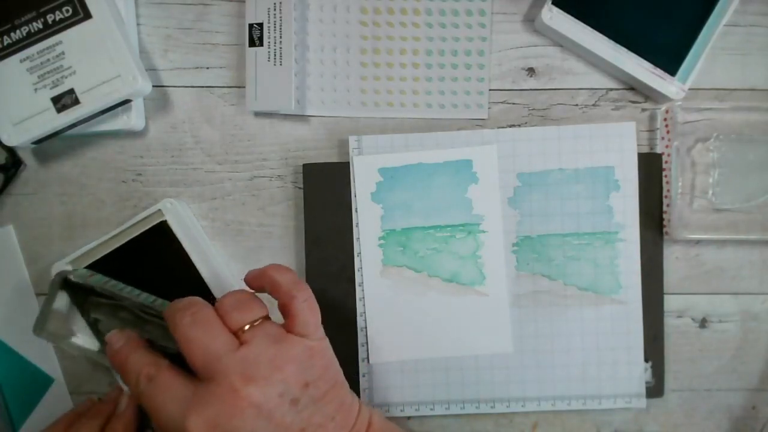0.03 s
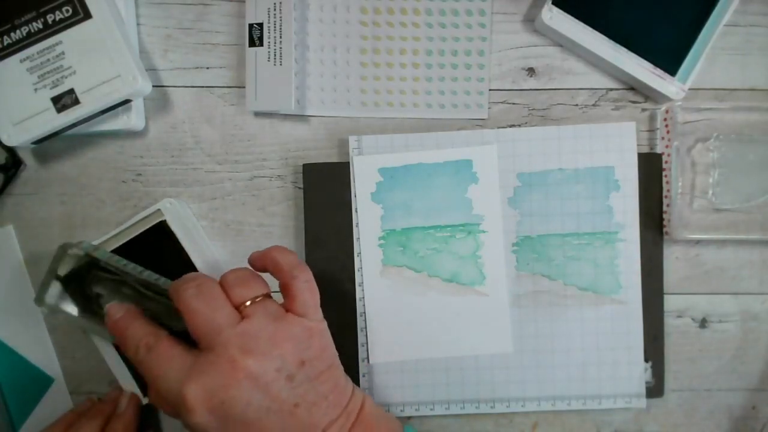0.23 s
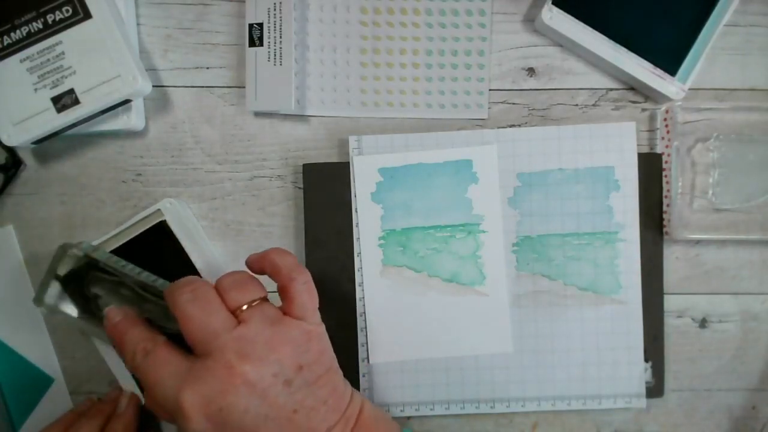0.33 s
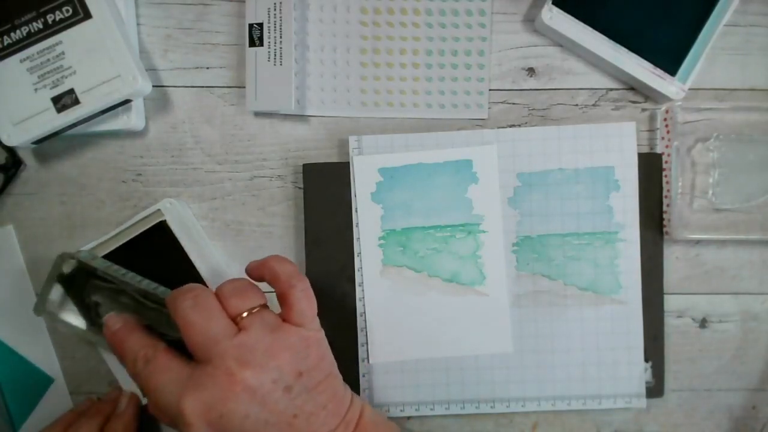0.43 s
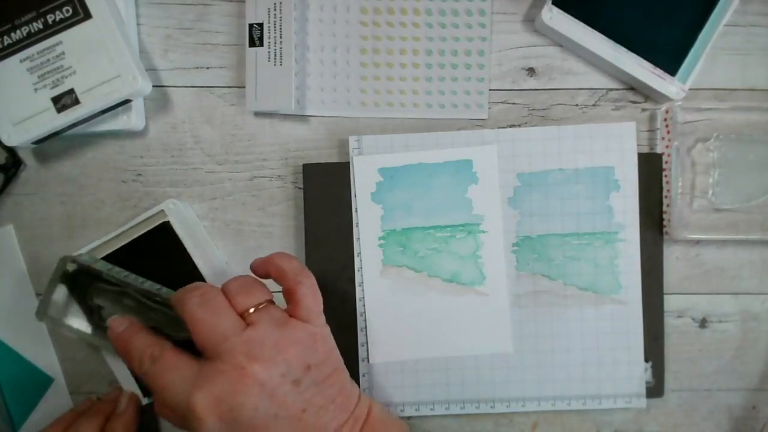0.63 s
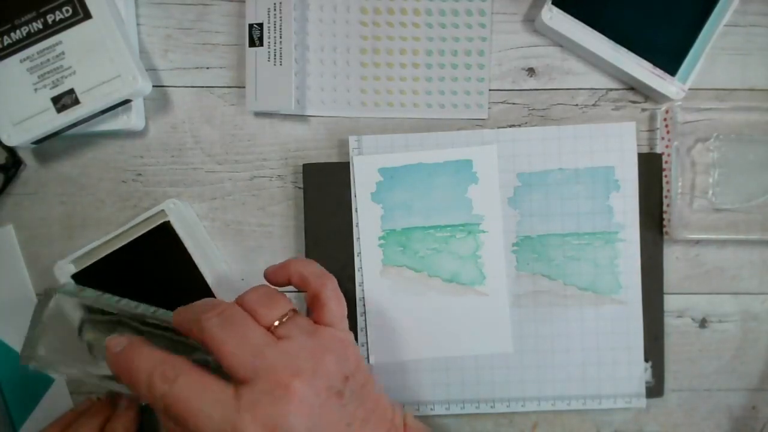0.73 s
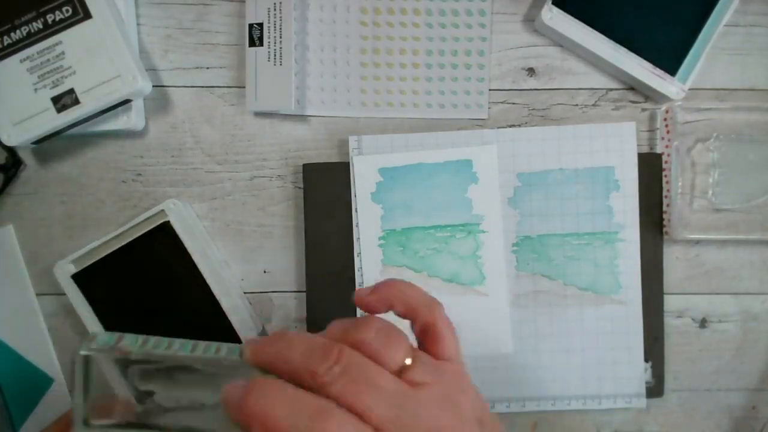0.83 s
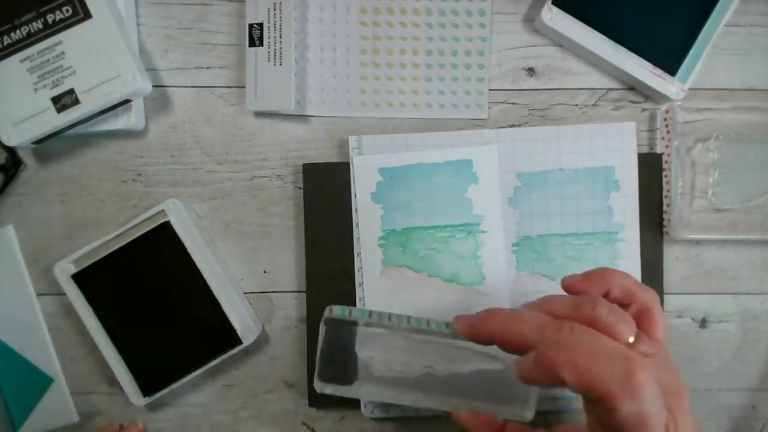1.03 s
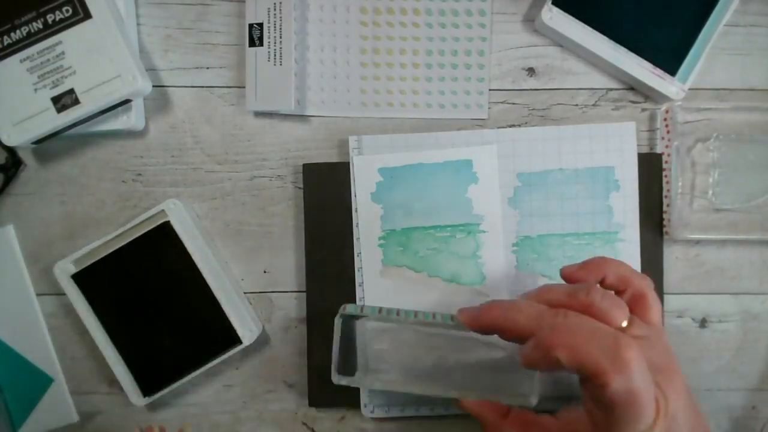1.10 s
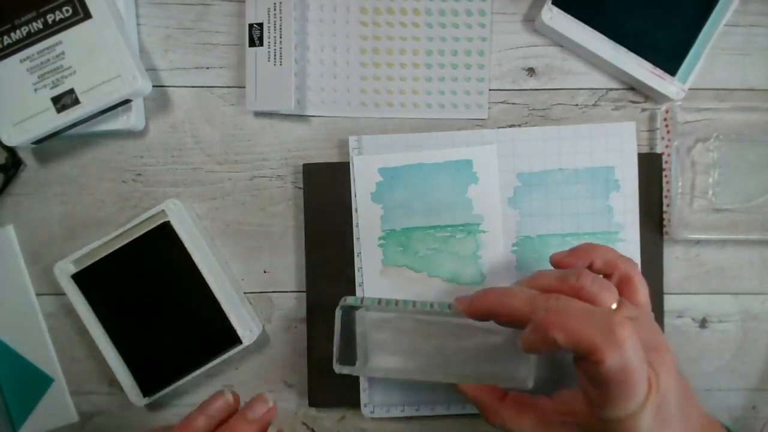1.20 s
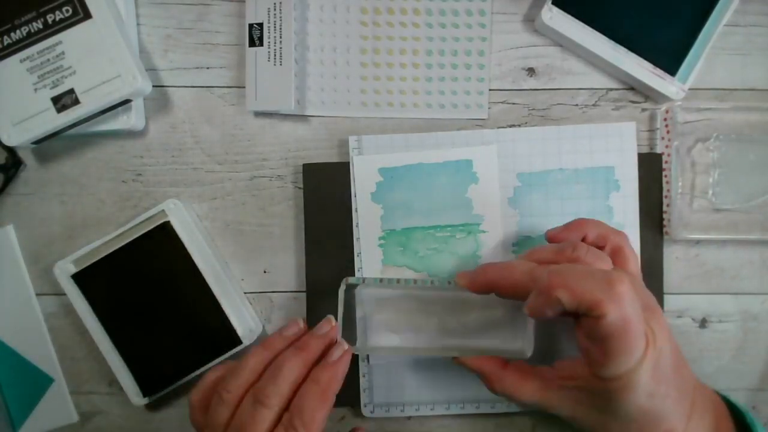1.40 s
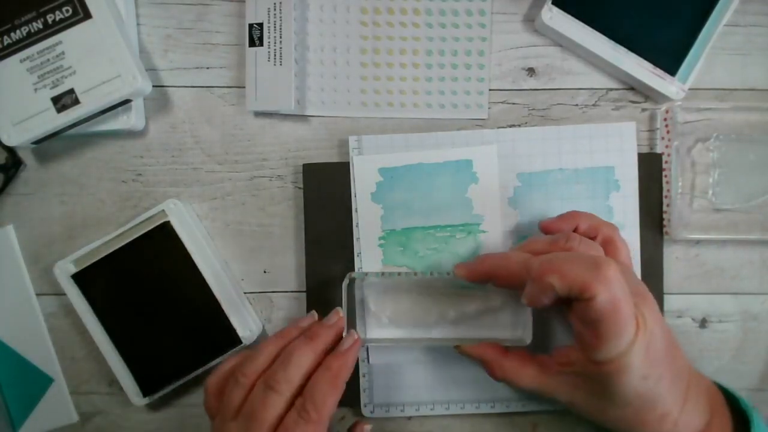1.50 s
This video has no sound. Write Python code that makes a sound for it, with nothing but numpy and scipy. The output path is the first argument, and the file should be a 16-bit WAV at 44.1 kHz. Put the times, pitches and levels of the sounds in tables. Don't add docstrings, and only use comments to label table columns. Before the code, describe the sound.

A block taps an ink pad in a plastic case at about 0.2, 0.4 and 0.6 seconds, growing from a dull gentle thud to a hard, rattling clack. Deep desk thumps boom through the microphone stand; tiny clicks and faint sticky crackles surround the taps. From 0.75 to 1.45 a sleeve rubs softly across the desk, strongest near 1.0, over quiet hum, fan and hiss in a small dry room.

```python
import sys
import numpy as np
from scipy import signal
from scipy.io import wavfile
from scipy.ndimage import uniform_filter1d

SR = 44100
rng = np.random.default_rng(int(sys.argv[2]) if len(sys.argv) > 2 else 0)


def persist_wave(psi):
    counts = np.round(np.clip(psi, -1, 1) * 32767).astype(np.int16)
    wavfile.write(sys.argv[1], SR, np.atleast_2d(counts).T)


def nominal_scale(level):
    x = np.asarray(level, float) / 20
    return 10 ** x


N = 68355

# start_s, desk_thump_db, desk_knock_db, case_knock_db, edge_crack_db
TAPS = [
    (0.219, -5, -7.5, -22.5, -68),
    (.429, -1, -6, -18.5, -64),
    (.594, 2.5, 2.5, -4, -55.5),
]
# start_s, length_s, crackle_db, desk_push_db
PEELS = [
    (0.011, 0.031, -65.5, -32),
    (0.319, 0.033, -63, -22),
    (0.507, .02, -62.5, -24.5),
    (0.667, 0.0078, -56, -26.5),
]


def at_hz(points, hz):
    point_hz, point_db = np.array(points).T
    return np.interp(np.log(hz), np.log(point_hz), point_db, left=-60, right=-60)


def rms_one(x):
    return x / np.sqrt(np.mean(x ** 2) + 1e-20)


def drift(rate_hz):
    r = np.exp(-80 * np.pi * rate_hz / SR)
    slow = signal.lfilter([1], [1, -2 * r, r * r], rng.standard_normal(N // 40 + 2002))
    slow = rms_one(slow[2000:])
    return np.interp(np.arange(N) / 40, np.arange(len(slow)), slow)


def decay_per_sample(t60_s):
    return np.exp(-np.log(1000) / (t60_s * SR))


def ring(clicks, hz, t60_s):
    r = decay_per_sample(t60_s)
    w = 2 * np.pi * hz / SR
    return signal.lfilter([0, np.sin(w)], [1, -2 * r * np.cos(w), r * r], clicks + 1e-18)


def die_away(clicks, t60_s):
    return signal.lfilter([1], [1, -decay_per_sample(t60_s)], clicks)


def clicks_at(start_s, gains):
    out = np.zeros(N)
    places = np.clip((np.asarray(start_s) * SR).astype(int), 0, N - 1)
    np.add.at(out, places, gains)
    return out


def soften(x, hz):
    r = np.exp(-2 * np.pi * hz / SR)
    return signal.lfilter([(1 - r) ** 2], [1, -2 * r, r * r], x + 1e-18)


def banded_noise(spectrum, patchy_db):
    together = drift(6.0)
    edges = 19 * 2 ** np.arange(0, 9.9, 1 / 3)
    white = rng.standard_normal((2, N + 8000))
    out = 0
    for k, (low, high) in enumerate(zip(edges, edges[1:])):
        band_pass = signal.butter(2, [low, high], "band", fs=SR, output="sos")
        band = signal.sosfilt(band_pass, white[k % 2])[-N:]
        flicker_db = patchy_db * (0.23 * together + drift(8))
        out = out + band * nominal_scale(at_hz(spectrum, np.sqrt(low * high)) + flicker_db)
    return rms_one(out)


def hiss_and_hum():
    # freq_hz, level_db per Hz
    colour = [(20, -6.5), (60, -3), (390, -22.5), (520, -15), (1400, -15), (3000, -24), (4800, -33.5),
              (15500, -43)]
    hiss = nominal_scale(-66.5) * banded_noise(colour, patchy_db=1.5)
    hum = nominal_scale(-72) * np.sin(2 * np.pi * 120 * np.arange(N) / SR)
    return hiss + hum


def fan():
    pitch_hz, width_hz, level_db = 538, 31, -74
    return nominal_scale(level_db) * rms_one(ring(rng.standard_normal(N), pitch_hz, 3.0 / width_hz))


def sleeve():
    # start_s, rustle_db, sheen_db
    strokes = [
        (.72, -81.5, -88.5),
        (.8, -67, -87.5),
        (.86, -68.5, -81.5),
        (0.931, -64.5, -78),
        (1.028, -60.5, -74.5),
        (1.272, -64, -86),
        (1.37, -65, -77.5),
        (1.42, -70.5, -85),
        (1.47, -83.5, -87),
    ]
    # freq_hz, level_db per Hz
    rustle_colour = [(150, -16.5), (270, -2), (420, -9), (620, -3.5), (1500, -6.5), (2200, -13),
                     (4200, -17.5), (5500, -34.5)]
    # freq_hz, level_db per Hz
    sheen_colour = [(4500, -4.5), (6500, -0.5), (8200, 6.5), (10000, 0), (15500, -12)]
    start_s, rustle_db, sheen_db = np.transpose(strokes)
    t = np.arange(N) / SR
    on = np.interp(t, [start_s[0] - .05, start_s[0]], [0, 1])
    rustle = nominal_scale(np.interp(t, start_s, rustle_db) + 0.5) * banded_noise(rustle_colour, patchy_db=1.0)
    sheen = nominal_scale(np.interp(t, start_s, sheen_db) + .7) * banded_noise(sheen_colour, patchy_db=-0.5)
    return on * (rustle + sheen)


def ticks():
    # start_s, pitch_hz, level_db, t60_s
    contacts = [
        (.1067, 5240, -61, 0.016),
        (0.1075, 1860, -45, 0.005),
        (0.1075, 4110, -65, 0.053),
        (0.3445, 8240, -66, 0.0089),
        (0.3444, 5500, -69, 0.0043),
        (.014, 873, -58, 0.11),
        (0.032, 325.4, -50.5, 0.14),
    ]
    out = np.zeros(N)
    for start_s, hz, level_db, t60_s in contacts:
        out += soften(ring(clicks_at([start_s], nominal_scale(level_db + 6)), hz, t60_s), 0.96 * hz)
    return out


def peels():
    grains_per_s, low_hz, high_hz, cycles = 6000, 650, 1600, 4.0
    t = np.arange(N) / SR
    shape = np.zeros(N)
    for s, length_s, crackle_db, _ in PEELS:
        corners_s = [s, s + .003, s + length_s, s + 1.6 * length_s]
        shape += nominal_scale(crackle_db) * np.interp(t, corners_s, [0, 1, .45, 0])
    grains = shape * (rng.random(N) < grains_per_s / SR) * rng.standard_normal(N)
    dealt = rng.integers(0, 12, N)
    swarm = np.zeros(N)
    for k, hz in enumerate(np.geomspace(low_hz, high_hz, num=12)):
        swarm += ring(grains * (dealt == k), hz, cycles / hz)
    return 2.87 * soften(swarm, 2100)


def edge_crack():
    mode_hz = [1350, 1800, 2300, 2800, 3600, 4500, 5600, 7800]
    mode_db = [9.5, 3, -4, -1.5, -0.5, -10.5, -14, -17.5]
    start_s, crack_db = np.transpose(TAPS)[[0, 4]]
    edge = clicks_at(start_s + .001, nominal_scale(crack_db))
    tail = soften(die_away(edge, t60_s=.03), 280)
    grit = edge + nominal_scale(-23) * rng.standard_normal(N) * tail
    crack = np.zeros(N)
    for k, (hz, level_db) in enumerate(zip(mode_hz, mode_db)):
        crack += (-1) ** k * nominal_scale(level_db + 9.5) * ring(grit, hz, 20.0 / hz)
    return signal.sosfilt(signal.butter(4, 10900, fs=SR, output="sos"), crack)


def case():
    # pitch_hz, level_db, t60_s
    modes = [(528, -32, 0.061), (578.7, -38.5, 0.14), (704.6, -28, 0.035), (863, -36.5, 0.099),
             (983, -49, 0.15), (1013, -46, 0.17), (1130, -19, 0.019), (1320, -36, 0.013),
             (1670, -35.5, 0.03), (2170, -40, 0.03), (3550, -43.5, 0.036)]
    # lag_s, level_db
    bounces = [
        (.017, -15.5),
        (.029, -15),
        (.05, -26),
    ]
    knock_lag_s, contact_hz = 0.002516, 1090
    rattle_db, rattle_t60_s, rattles_per_s = -25, .15, 500
    soft_tilt = .15
    start_s, knock_db = np.transpose(TAPS)[[0, 3]]
    dying = die_away(clicks_at(start_s + 0.0086, nominal_scale(knock_db + rattle_db)), rattle_t60_s)
    touches = dying * (rng.random(N) < rattles_per_s / SR)
    out = np.zeros(N)
    for k, (hz, level_db, t60_s) in enumerate(modes):
        tilt_db = soft_tilt * (knock_db - knock_db.max()) * np.log2(hz / 600)
        strength = (-1) ** k * nominal_scale(knock_db + tilt_db)
        hits = clicks_at(start_s + knock_lag_s, strength)
        for lag_s, loss_db in bounces:
            signs = rng.choice([-1, 1], len(start_s))
            hits = hits + clicks_at(start_s + lag_s, strength * nominal_scale(loss_db) * signs)
        chatter = touches * rng.standard_normal(N)
        out += nominal_scale(level_db + 8) * ring(hits + chatter, hz, t60_s)
    return soften(soften(out, contact_hz), 6000)


def desk_modes(blows, modes):
    return sum(sign * nominal_scale(level_db) * ring(blows, hz, t60_s) for hz, level_db, t60_s, sign in modes)


def desk():
    # pitch_hz, level_db, t60_s, polarity
    low_modes = [(26.7, -25, 0.6, -0.54), (44.3, -36.5, 0.12, 0.8), (46.24, -15, 0.38, 0.78),
                 (64.4, -10.5, 0.14, -0.54), (84.75, -25, 0.39, -0.48)]
    # pitch_hz, level_db, t60_s, polarity
    mid_modes = [(114, -25, 0.21, -0.23), (144, -28.5, 0.3, 0.55), (194.1, -24, 0.25, -0.38),
                 (240.5, -25, 0.3, 0.2), (285.3, -20.5, 0.028, 0.39), (284.8, -23.5, 0.097, -0.69),
                 (351.8, -31, 0.23, -0.24), (403.3, -32, 0.12, -0.76), (476.6, -27, 0.079, 0.3)]
    # start_s, thump_db, knock_db
    nudges = [
        (.0, -31.5, -30),
        (.028, -36.5, -50),
        (0.789, -24, -64),
        (0.913, -31, -29.5),
        (1.005, -36, -48),
        (1.466, -44, -49),
    ]
    tap_s, thump_db, knock_db = np.transpose(TAPS)[:3]
    peel_s, peel_db = np.transpose(PEELS)[[0, 3]]
    nudge_s, nudge_thump_db, nudge_knock_db = np.transpose(nudges)
    push = clicks_at(tap_s - 0.0011, nominal_scale(thump_db))
    push = push - clicks_at(peel_s, nominal_scale(peel_db)) + clicks_at(nudge_s, nominal_scale(nudge_thump_db))
    knock = clicks_at(tap_s + 0.0032, nominal_scale(knock_db))
    knock = knock + clicks_at(peel_s + 0.028, nominal_scale(peel_db)) + clicks_at(nudge_s, nominal_scale(nudge_knock_db))
    return soften(desk_modes(push, low_modes), 315) + soften(desk_modes(knock, mid_modes), 1100)


def room(x):
    t60_s, wall_cut_hz = .22, 4000
    out = np.zeros(N)
    dull = np.exp(-2 * np.pi * wall_cut_hz / SR)
    lags = (rng.uniform(.012, .035, size=8) * SR).astype(int)
    for k, lag in enumerate(lags):
        loop, state = x.copy(), [0.]
        gain = decay_per_sample(t60_s) ** lag
        for i in range(lag, N, lag):
            back, state = signal.lfilter([gain * (1 - dull)], [1, -dull], loop[i - lag:i], zi=state)
            loop[i:i + lag] += back[:N - i]
        out += (loop - x) * (-1) ** k
    return out


def scene():
    background = hiss_and_hum() + fan()
    air = ticks() + peels() + case() + edge_crack()
    echoes = nominal_scale(-19) * room(air + 1e-9)
    return (background + sleeve() + air + echoes + desk())[None]


def band_limit(x):
    return signal.sosfilt(signal.butter(12, 15620, fs=SR, output="sos"), x)


def record(dry):
    top_hz, duck_db, duck_from_db, hold_s = 10400, -4, -40, .06
    power = uniform_filter1d(dry ** 2, int(hold_s * SR), axis=1)
    level_db = 10 * np.log10(power + 1e-12)
    loud = np.clip((level_db - duck_from_db) / 4, 0, 1)
    top = signal.sosfiltfilt(signal.butter(8, top_hz, "high", fs=SR, output="sos"), dry)
    mix = dry - top * (1 - nominal_scale(duck_db * loud))
    return band_limit(mix)


dry = scene()
out = record(dry)
persist_wave(out)
```